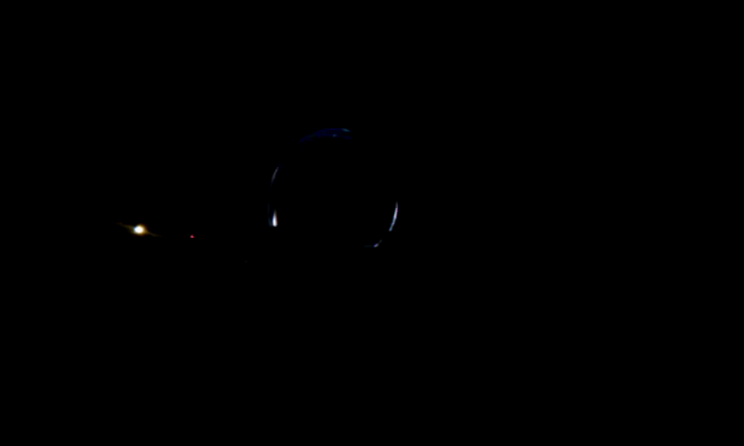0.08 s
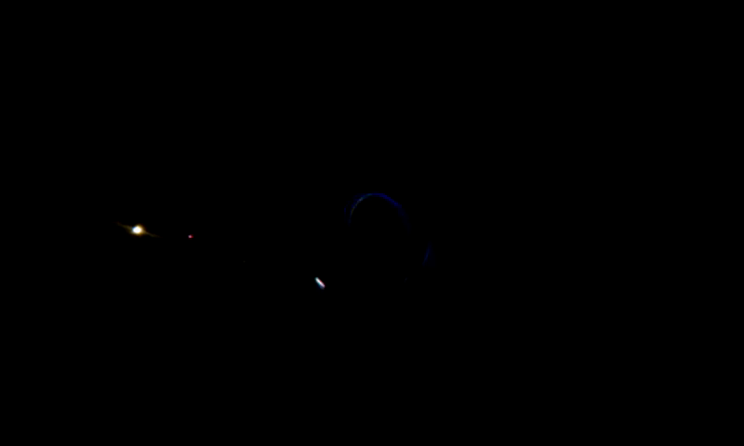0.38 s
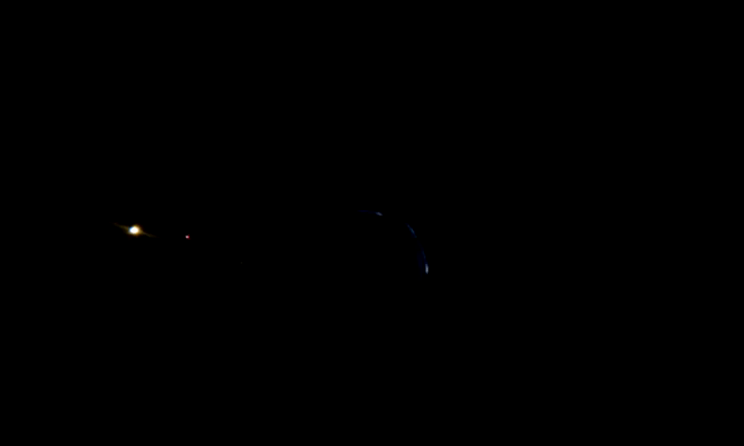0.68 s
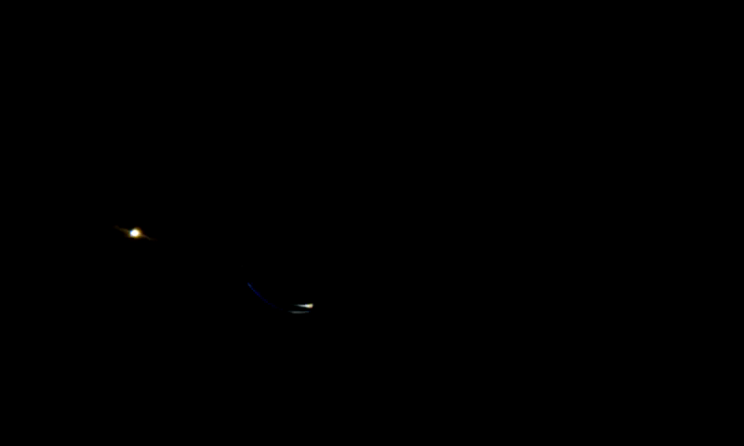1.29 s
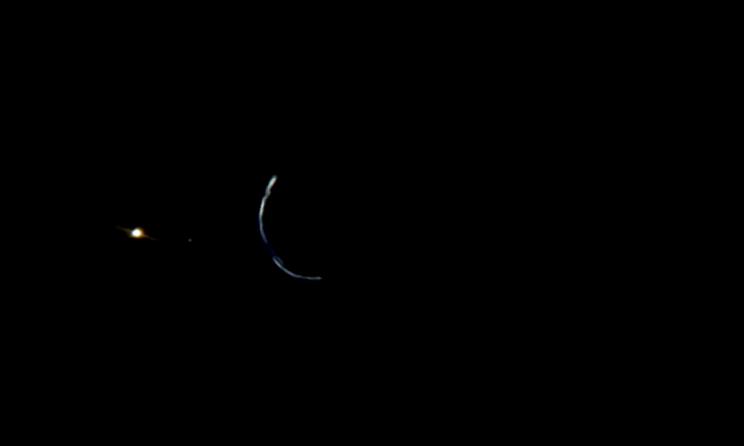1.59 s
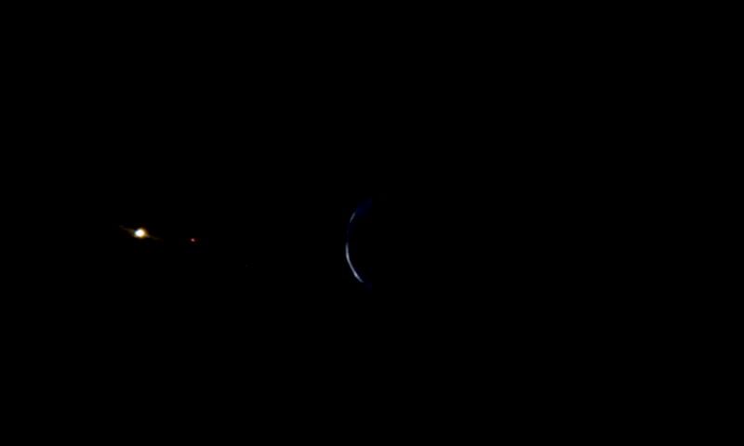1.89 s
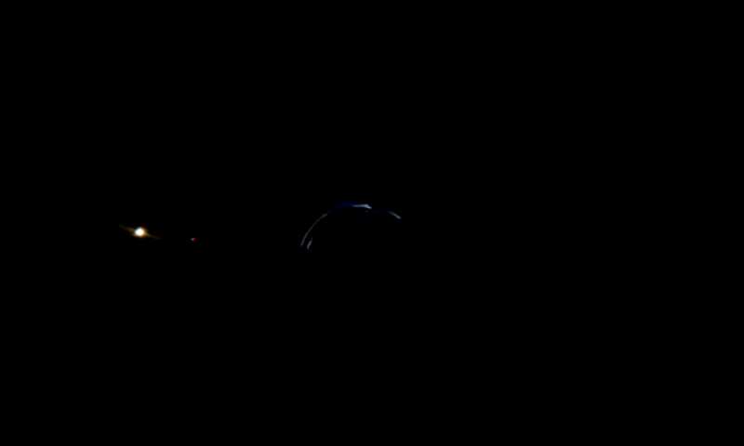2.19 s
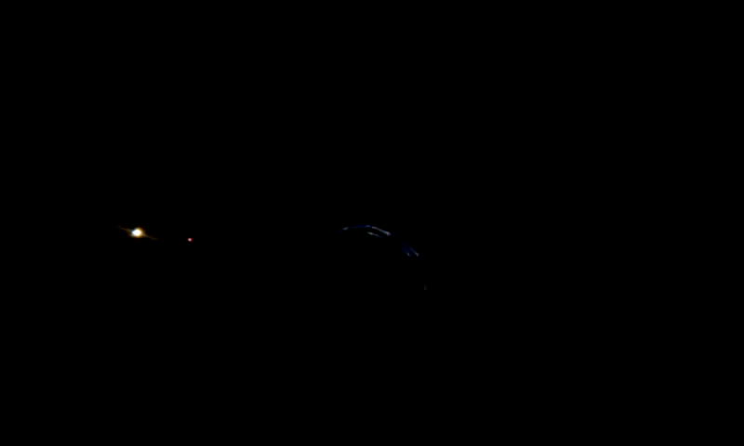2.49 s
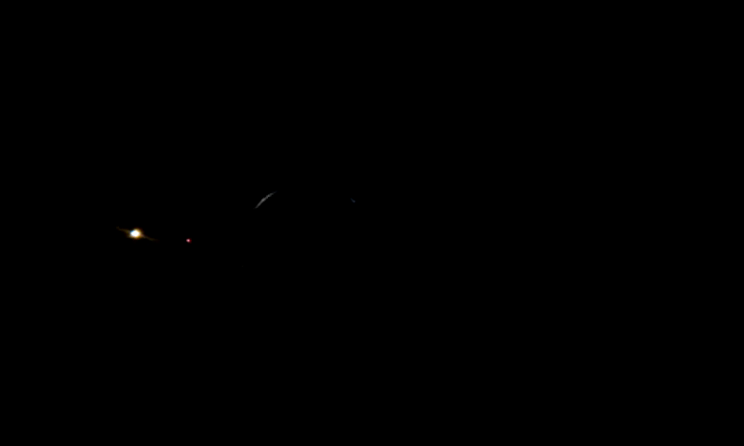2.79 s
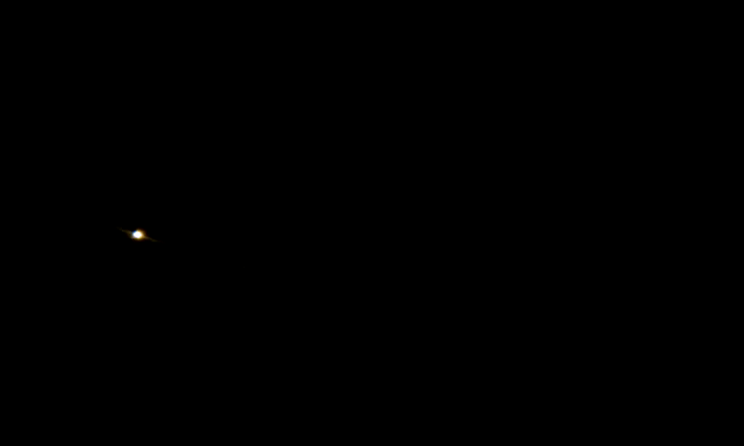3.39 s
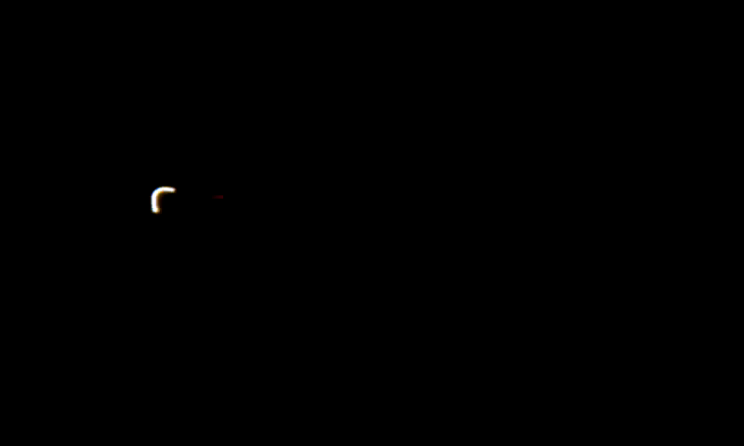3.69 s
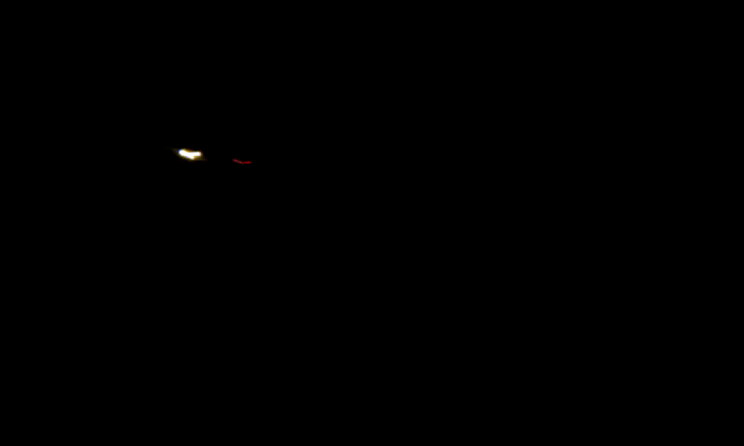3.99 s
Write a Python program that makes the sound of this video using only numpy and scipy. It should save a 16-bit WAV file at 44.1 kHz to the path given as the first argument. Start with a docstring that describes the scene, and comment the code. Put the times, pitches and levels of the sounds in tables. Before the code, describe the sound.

Burning wicks swing in circles, whooshing about three or four times a second with a fluttering, hollow roar over faint outdoor air. The flames spit and puff, most clearly around 1.1, 2.7 and 3 seconds. From 3 seconds a thin, faintly whistling sizzle sets in as the swings die down. A loud handling click hits the muffled phone microphone at 3.7 seconds, with smaller clicks around 3.9.

```python
"""Burning wicks swing in circles at night, each swing a fluttering roar of turbulent flame.
The ground echo sweeps a comb through the roar as the flame dips and climbs. The flames spit and
puff, and a thin sizzle sets in as the swings die down. Near the end, handling clicks ring the
casing of the narrow-band phone that hears it all; the hardest one overloads it."""
import sys
import numpy as np
from scipy import signal
from scipy.fft import rfft, irfft
from scipy.io import wavfile
from scipy.ndimage import map_coordinates

SR = 44100
rng = np.random.default_rng(int(sys.argv[2]) if len(sys.argv) > 2 else 0)


def transcribe(signal):
    """Save signal, clipped to [-1, 1], as a 16-bit WAV file at the path in sys.argv[1]."""
    frames = np.atleast_2d(signal).T
    limited = np.clip(frames, -1, 1)
    pcm = np.round(limited * 32767).astype(np.int16)
    wavfile.write(sys.argv[1], SR, pcm)


N = 176400


def undb(db):
    """Decibels to amplitude."""
    return 10 ** (np.asarray(db) / 20)


def colour(x, curve):
    """EQ a signal along a curve of (freq_hz, gain_db) points."""
    hz, db = np.array(sorted(curve)).T
    bins_hz = np.maximum(np.fft.rfftfreq(2 * N, 1 / SR), 1)
    gain = undb(np.interp(np.log(bins_hz), np.log(hz), db))
    return irfft(rfft(x, 2 * N) * gain)[:N]


def noise(curve):
    """Coloured noise at an rms of 1."""
    x = colour(rng.standard_normal(N), curve)
    return x / x.std()


def wander(rate_hz):
    """A random modulator with a spread of 1, gliding to a new value rate_hz times a second."""
    targets = rng.standard_normal(N // 10)
    glide = np.interp(np.arange(N) / SR * rate_hz, np.arange(N // 10), targets)
    return glide / glide.std()


def since(start_s):
    """Seconds since a moment, zero before it."""
    return np.maximum(np.arange(N) / SR - start_s, 0)


def mode(age, pitch_hz, t60_s, rise_s):
    """One damped vibration with a soft attack."""
    attack = 1 - np.exp(-(age / rise_s) ** 2)
    return np.sin(2 * np.pi * pitch_hz * age) * np.exp(-np.log(1000) * age / t60_s) * attack


def night_air():
    """A steady, dull bed of outdoor noise."""
    # freq_hz, gain_db
    tone = [(25, -31), (60, -11.5), (110, -2), (250, -2), (450, -2.5), (1100, -6), (1700, -3), (2400, -28)]
    return undb(-46) * noise(tone)


def flames():
    """Turbulent roar, rush and hiss swell with every swing and flutter as the flame tears."""
    # swells of the swings: peak_s, rise_s, roar_db, rush_db, hiss_db
    whooshes = [(0.096, 0.064, -42, -34, -50), (0.242, 0.093, -40, -39.5, -48.5),
                (0.352, 0.03, -42.5, -40, -48), (0.408, 0.058, -39.5, -36, -46.5),
                (0.54, 0.051, -41, -35, -42), (0.651, 0.064, -43, -37.5, -53),
                (0.779, 0.012, -36.5, -34, -50), (0.897, 0.054, -41, -37, -49.5),
                (1.127, 0.054, -40, -31.5, -41), (1.196, 0.016, -55.5, -33, -45.5),
                (1.333, .025, -43.5, -58, -61), (1.43, 0.076, -43.5, -39, -48.5),
                (1.683, 0.042, -40.5, -34, -43.5), (1.764, .06, -43, -39.5, -49),
                (1.952, 0.093, -66, -43.5, -49.5), (2.102, 0.063, -46, -36, -43.5),
                (2.177, 0.032, -40.5, -37.5, -49), (2.34, 0.02, -47, -48.5, -67),
                (2.41, 0.065, -40.5, -40, -59), (2.582, 0.039, -39.5, -35.5, -46),
                (2.652, 0.026, -40, -33.5, -33.5), (2.728, 0.028, -45.5, -35.5, -42),
                (2.977, 0.046, -42, -36.5, -40.5), (3.068, 0.029, -38, -34.5, -40.5),
                (3.19, 0.063, -44, -39, -55.5), (3.312, 0.023, -46, -39.5, -50)]
    # tone of the low, middle and high layers: freq_hz, gain_db
    roar = [(25, -44.5), (50, -27), (75, -10.5), (130, -5), (250, 0), (400, -2), (600, -13), (1000, -30),
            (2000, -52)]
    rush = [(200, -29), (450, -3), (700, -1.5), (1000, 1), (1300, -3.5), (1700, 2), (1950, -5.5),
            (2250, -20), (3000, -36)]
    hiss = [(1200, -31), (1900, -2), (2300, 1), (2800, 5), (3300, 4.5), (3700, -4), (4500, -15.5)]
    # level ride on the steady burn between swings: time_s, gain_db
    burn_ride = [(0, 5.5), (1.0, 6), (1.3, 1), (2.2, 6), (2.85, 2), (3.3, -4.5), (3.6, -12.5), (4, 4.5)]
    # ground reflection, weakest in the treble: roar_gain, rush_gain, hiss_gain
    echo_gains = (.55, .72, .3)
    burn_base_db, own_flutter_db = (-55, -47.5, -52), (2.17, 1.0, 0.76)  # roar, rush, hiss
    flutter_hz, fall_over_rise = 80.3, 0.98
    t = np.arange(N) / SR
    shared_flutter_db = 1.15 * wander(flutter_hz)
    ride_db = np.interp(t, *np.array(burn_ride).T)
    out = np.zeros(N)
    for layer, tone in enumerate([roar, rush, hiss]):
        power = undb(burn_base_db[layer] + ride_db) ** 2
        for peak_s, rise_s, *levels_db in whooshes:
            width_s = np.where(t < peak_s, rise_s, rise_s * fall_over_rise)
            power += undb(levels_db[layer]) ** 2 * np.exp(-((t - peak_s) / width_s) ** 2)
        gas = noise(tone) * np.sqrt(power)
        flutter = undb(shared_flutter_db + own_flutter_db[layer] * wander(flutter_hz))
        out += ground_echo(gas * flutter, echo_gains[layer])
    return out


def ground_echo(flame, echo_gain):
    """The ground mirrors the flame; the echo's lag follows its height and sweeps a comb filter."""
    # circles of the wick: low_point_s, low_point_lag_ms, next_top_lag_ms
    circles = [(.036, 0.69, 1.59), (.34, 0.69, 1.27), (.566, 0.33, 1.02), (.858, 0.31, 1.15),
               (1.093, .26, 1.24), (1.375, 0.43, 1.43), (1.624, 0.67, 1.84), (1.886, 0.66, 1.27),
               (2.135, 0.25, 1.146), (2.403, 0.25, 0.93), (2.655, 0.16, 1.35), (3.042, .42, 1.25),
               (3.303, 0.5, 0.39)]
    low_s, low_lag_ms, top_lag_ms = np.array(circles).T
    t = np.arange(N) / SR
    turns = np.interp(t, np.append(low_s, N / SR), np.arange(len(circles) + 1))
    circle = np.minimum(turns.astype(int), len(circles) - 1)
    height = np.sin(np.pi * turns) ** 2
    lag_ms = (1 - height) * np.interp(t, low_s, low_lag_ms) + height * top_lag_ms[circle]
    echo = map_coordinates(flame, [(t - lag_ms / 1000) * SR], order=1, mode="mirror")
    return (flame + echo_gain * echo) / np.hypot(1, echo_gain)


def spits():
    """The flame spits: bright noise bursts with a sharp attack and a short tail."""
    # spits of flame: start_s, level_db, decay_s
    bursts = [(0.349, -35, 0.012), (1.106, -31, 0.015), (2.7, -22, .022), (3.01, -29, 0.03),
              (3.424, -28.5, 0.011)]
    # tone of a spit: freq_hz, gain_db
    tone = [(150, -16), (700, -4), (1800, -9), (2400, -1), (2850, 3.5), (3500, -1), (4500, -20.5)]
    rise_s = 0.0013
    envelope = np.zeros(N)
    for start_s, level_db, decay_s in bursts:
        age = since(start_s)
        envelope += undb(level_db) * (1 - np.exp(-age / rise_s)) * np.exp(-age / decay_s)
    return noise(tone) * envelope


def puffs():
    """Soft thuds of air, each one low damped tone that rises over half a cycle."""
    # puffs of air: start_s, pitch_hz, level_db, t60_s
    thuds = [(1.064, 296, -12.5, 0.018), (2.31, 83, -26, 0.076), (2.985, 293, -23, 0.047),
             (3.821, 201, -28.5, 0.021)]
    return sum(undb(level_db) * mode(since(start_s), pitch_hz, t60_s, rise_s=.5 / pitch_hz)
               for start_s, pitch_hz, level_db, t60_s in thuds)


def sizzle():
    """A thin hiss fades in and stays; its faint whistles wander in pitch."""
    # hiss with narrow whistling peaks: freq_hz, gain_db
    tone = [(1400, -30), (1900, -5.5), (2250, -7), (2550, -6.5), (2760, -5), (2860, 1.5), (3000, -10),
            (3240, -3), (3340, 3.5), (3460, -3.5), (3800, -16), (4500, -21)]
    start_s, rise_s, level_db = 2.98, 0.13, -38.5
    speed = 1 + .013 * wander(rate_hz=9)
    hiss = map_coordinates(noise(tone), [np.cumsum(speed)], order=3, mode="mirror")
    waver_db = .6 * wander(rate_hz=25)
    fade_in = np.minimum(since(start_s) / rise_s, 1)
    return hiss * undb(level_db + waver_db) * fade_in


def handling():
    """Fingers click against the casing: a short ring and a duller knock."""
    # finger contacts: start_s, ring_db, knock_db
    clicks = [(3.6938, -24, -23.5), (3.6972, -28, -37), (3.7064, 4.5, -15.5), (3.8881, -11.5, -38),
              (3.9233, -25, -12), (3.926, -43, -23), (3.936, -23, -29), (3.9952, -17, -26)]
    # casing modes of the ring and the knock: pitch_hz, gain_db, t60_s
    ring = [(2213, 2.5, 0.016), (1377, -17.5, 0.022)]
    knock = [(560, 1, 0.008), (865, 1.5, 0.0087), (1530, -3.5, 0.0059), (3120, 0, 0.012),
             (3430, 5.5, 0.008)]
    contact_s = 0.00038
    out = np.zeros(N)
    for start_s, ring_db, knock_db in clicks:
        age = since(start_s)
        for modes, hit_db in ((ring, ring_db), (knock, knock_db)):
            for pitch_hz, gain_db, t60_s in modes:
                out += undb(hit_db + gain_db) * mode(age, pitch_hz, t60_s, contact_s)
    return out


def scene():
    """The fire and the handling clicks over the night bed, in mono."""
    return (flames() + spits() + puffs() + sizzle() + handling() + night_air())[None]


def record(dry):
    """The phone passes only a narrow band and clips the hardest peak."""
    # phone response: freq_hz, gain_db
    response = [(20, -2.5), (3400, -5.5), (3750, -7.5), (4100, -13), (4500, -26), (4900, -68),
                (6000, -84.5)]
    clip_level, top_hz = .72, 16000
    clipped = np.clip(colour(dry[0], response), -clip_level, clip_level)
    lowpass = signal.ellip(8, .2, 70, top_hz, fs=SR, output="sos")
    return signal.sosfilt(lowpass, clipped)[None]


dry = scene()
out = record(dry)
transcribe(out)
```